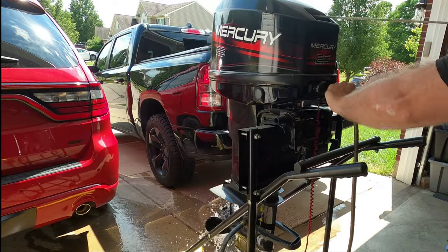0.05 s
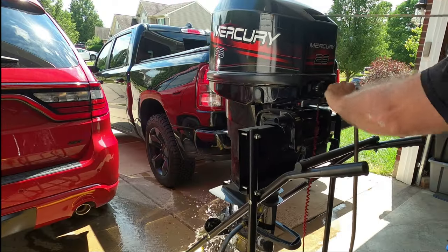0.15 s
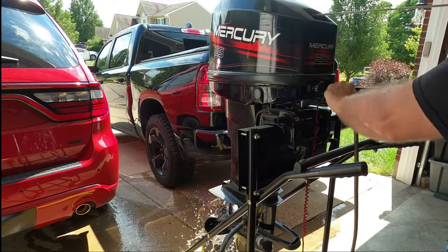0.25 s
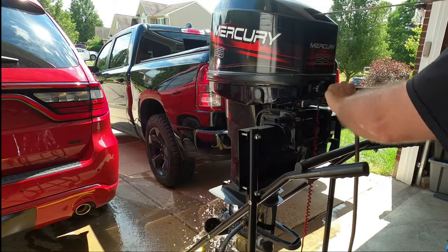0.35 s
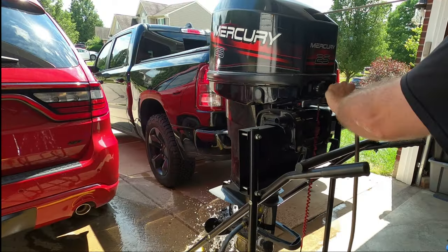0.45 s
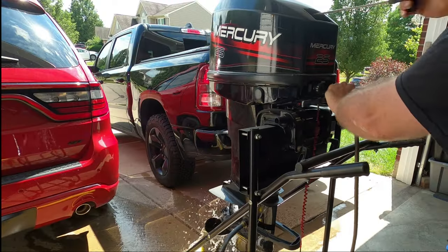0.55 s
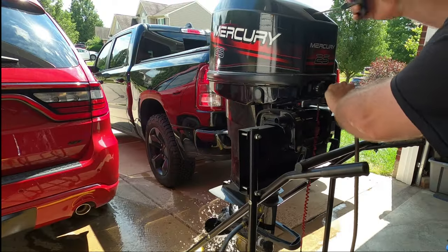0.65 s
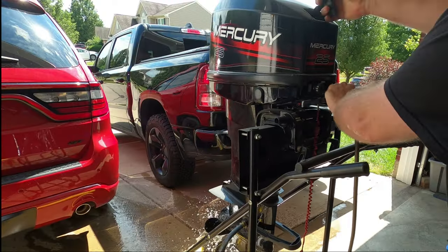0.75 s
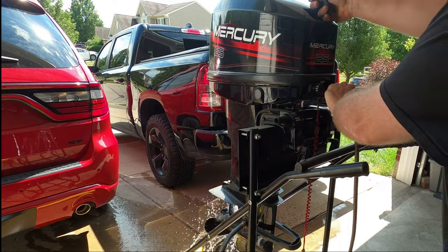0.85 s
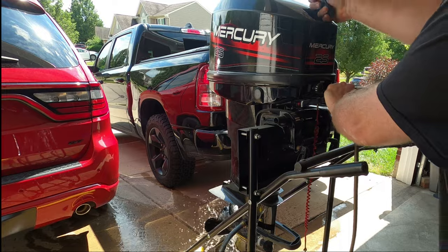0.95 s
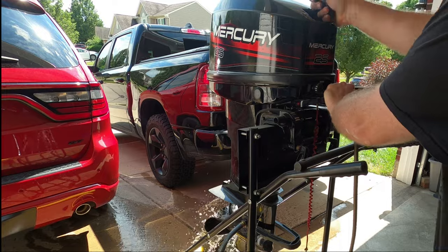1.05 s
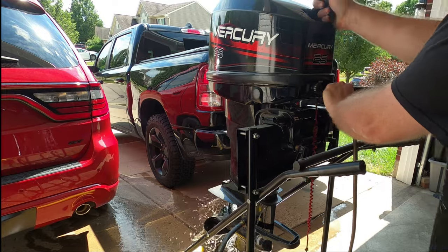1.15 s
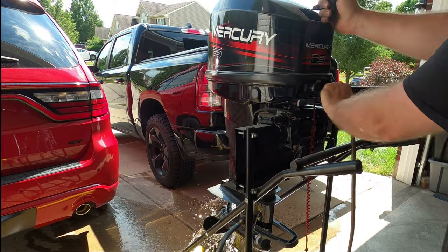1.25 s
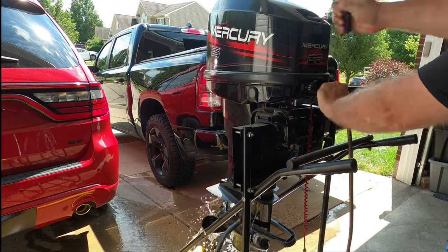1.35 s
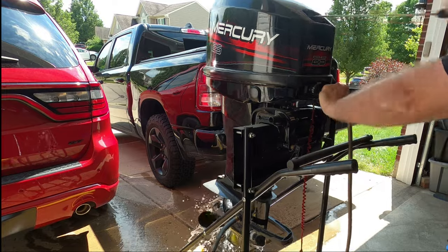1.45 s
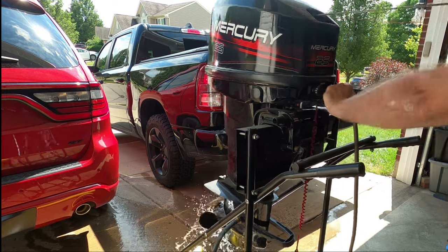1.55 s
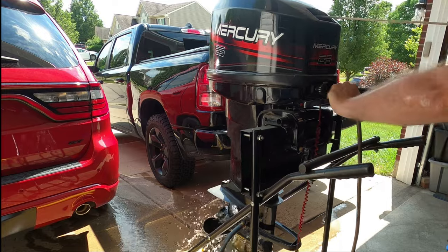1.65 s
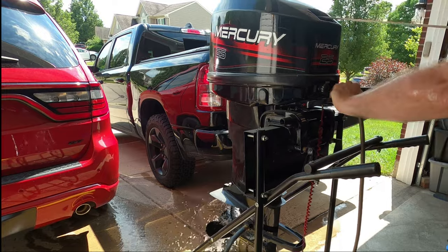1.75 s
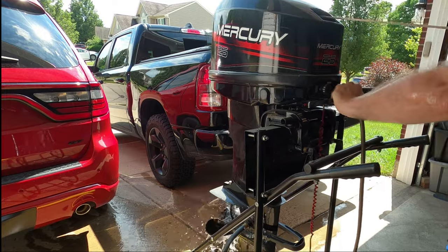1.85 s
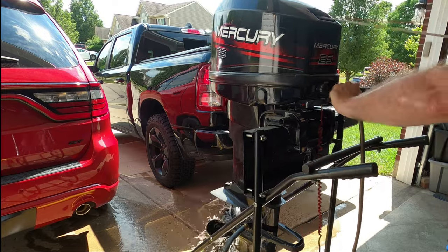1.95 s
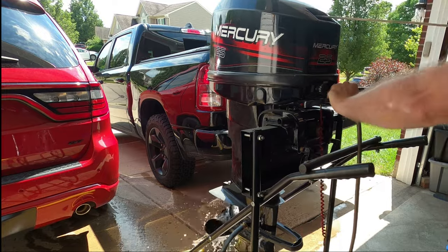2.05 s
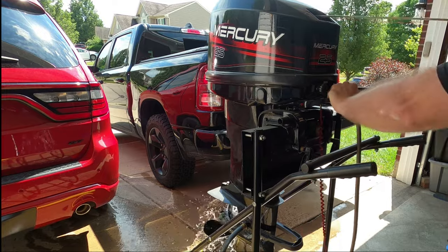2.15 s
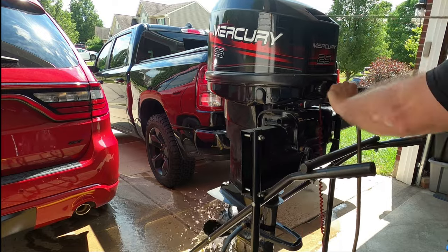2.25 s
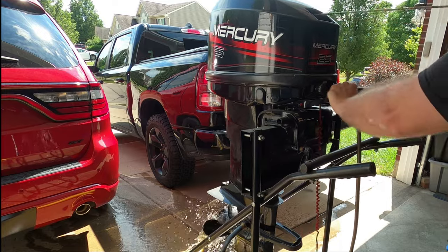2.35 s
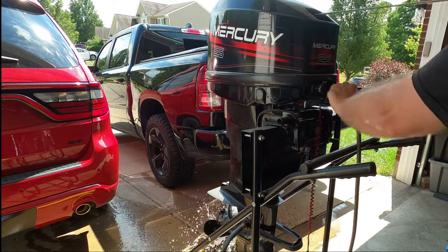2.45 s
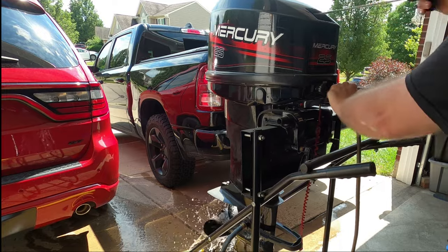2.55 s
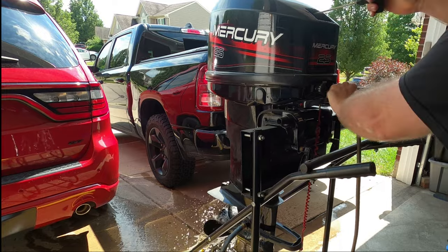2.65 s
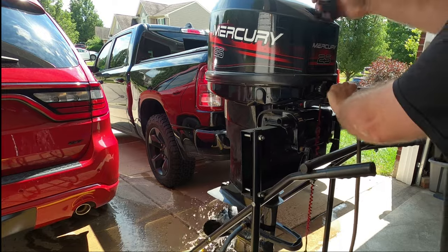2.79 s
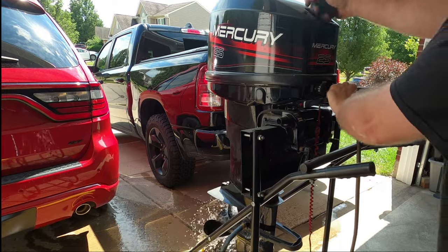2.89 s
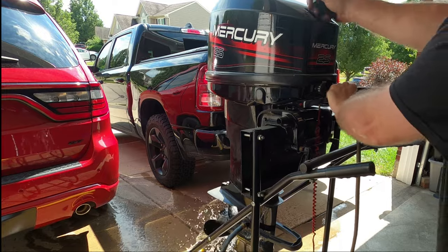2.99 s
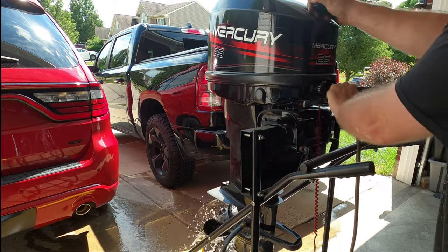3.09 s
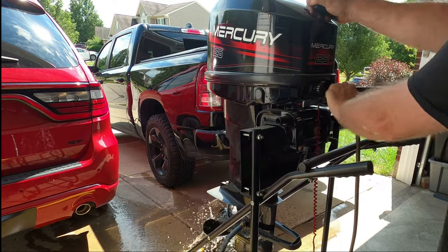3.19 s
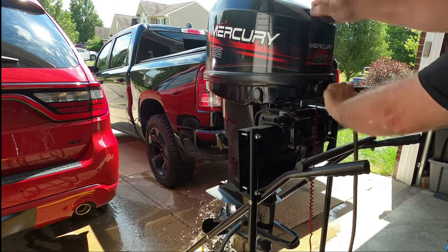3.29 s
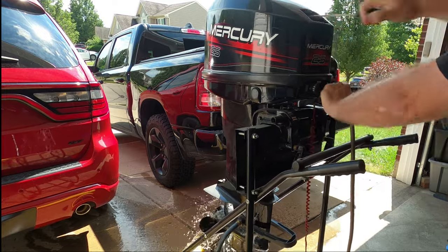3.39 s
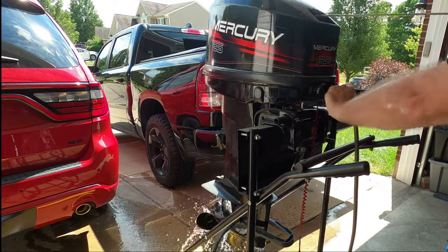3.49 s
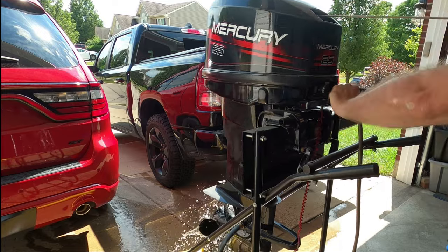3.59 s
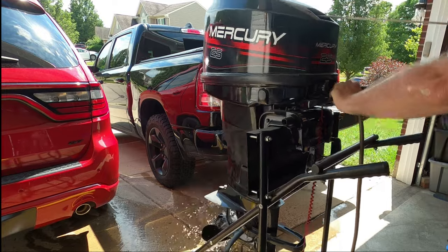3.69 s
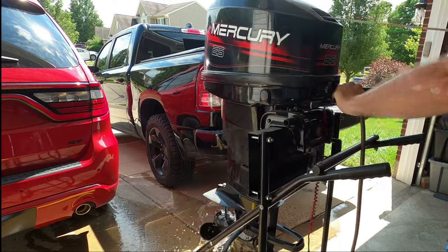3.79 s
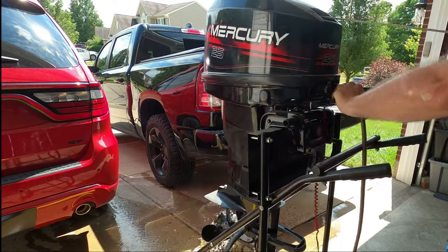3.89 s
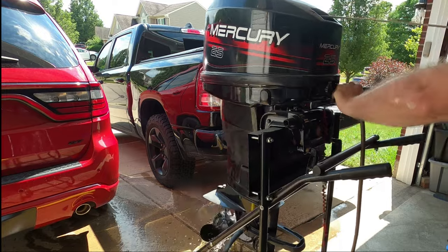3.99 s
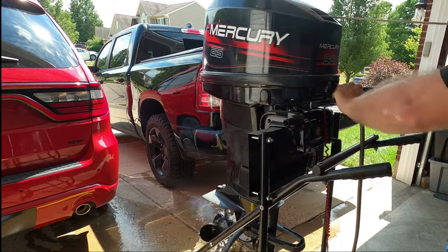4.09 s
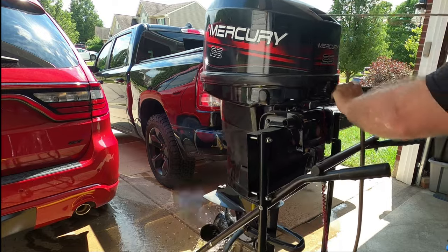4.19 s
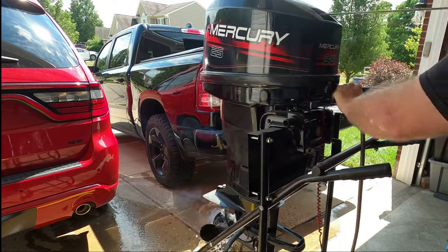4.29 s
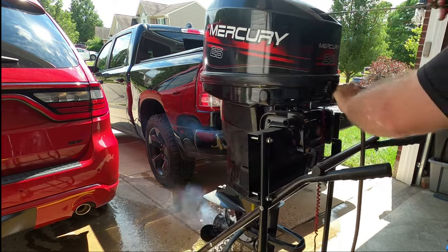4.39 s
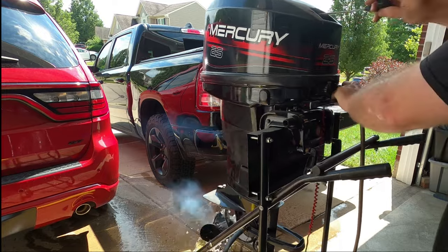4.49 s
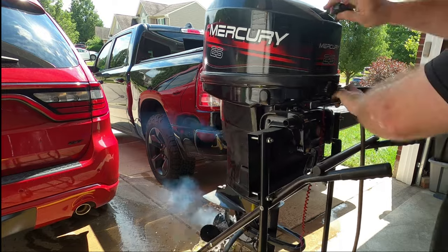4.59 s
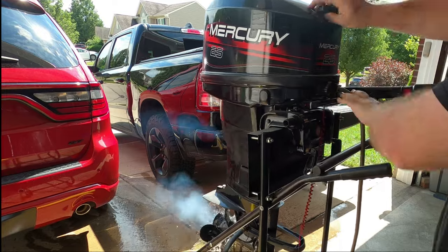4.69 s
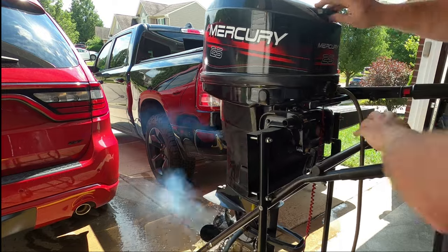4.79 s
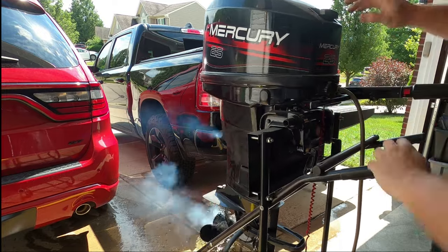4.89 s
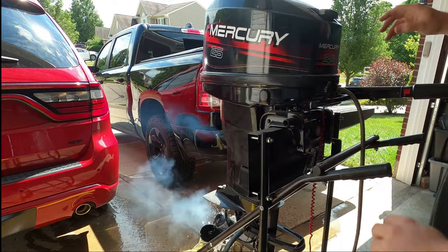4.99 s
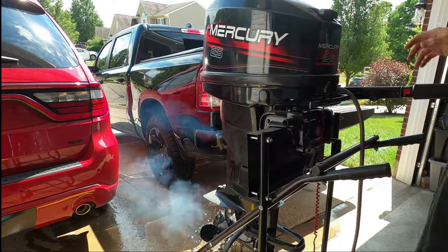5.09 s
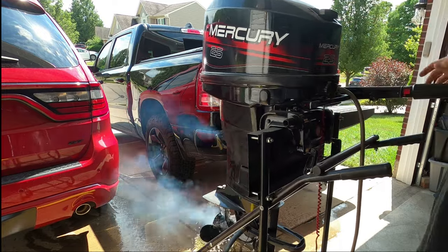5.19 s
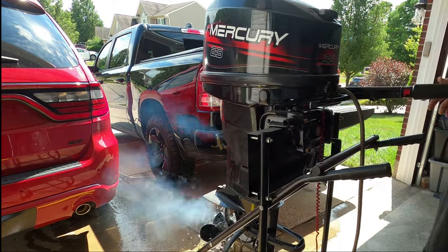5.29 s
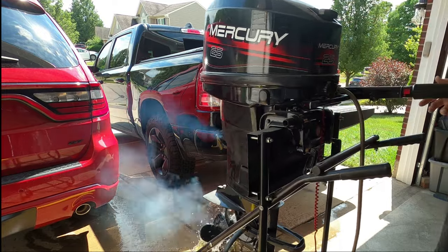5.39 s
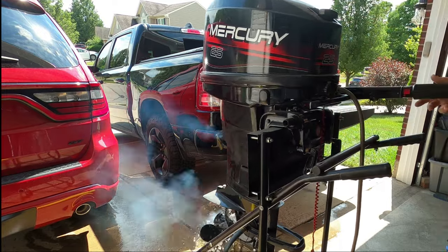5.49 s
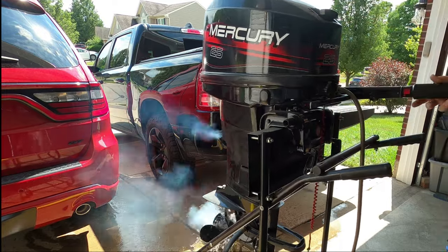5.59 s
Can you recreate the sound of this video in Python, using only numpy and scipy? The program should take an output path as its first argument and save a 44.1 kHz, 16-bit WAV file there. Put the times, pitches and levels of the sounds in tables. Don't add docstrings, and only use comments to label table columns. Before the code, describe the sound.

Water patters steadily on a concrete drive over a faint neighbourhood hum. A small outboard engine is yanked by rope: clunk, whirr, thudding compressions, then nothing. A second yank makes it sputter and fire, running in short barking groups with metallic rattles and hollow throaty exhaust between. Close microphones, short slap of echo from the wall.

```python
import sys
import numpy as np
from scipy import signal
from scipy.fft import rfft, irfft, next_fast_len
from scipy.io import wavfile
from scipy.ndimage import uniform_filter1d, map_coordinates

SR = 44100
rng = np.random.default_rng(int(sys.argv[2]) if len(sys.argv) > 2 else 0)


def attenuation_scalar(level_db):
    decades = np.asarray(level_db, float) / 20
    return 10 ** decades


def master(y):
    cut = np.clip(np.atleast_2d(y).T, -1, 1)
    pcm = np.round(cut * 32767)
    wavfile.write(sys.argv[1], SR, pcm.astype(np.int16))


N = 248724

# start in seconds, peak in dB, pipe pitch in Hz, throat gas in dB.
CHUFFS = [(0.0, -18.5, 54.2, -9), (0.048, -11.5, 62.2, -15.5), (0.102, -15.5, 59.2, -25),
          (0.168, -25.5, 65.5, -9), (0.22, -16.5, 64, -19), (1.555, -23, 84, 1.5), (1.633, -7, 79, -7.5),
          (1.697, -14.5, 95, 0), (1.749, -7, 60.2, -7.5), (1.799, -9, 72.4, -8), (1.843, -3.5, 64.7, -17.5),
          (1.897, -11, 51.6, -8), (1.968, -11.5, 82.3, -8.5), (2.056, -11.5, 58.6, -11),
          (2.209, -27, 71.3, -14), (2.253, -21, 64.7, -13), (3.556, -23, 75, -0.5), (3.626, -8, 81.4, -10),
          (3.694, -7, 78, -10), (3.727, -10, 77.6, -5.5)]
# start in seconds, rattle peak in dB, loosest part in Hz, bark in dB.
FIRED = [(1.7234, -19, 2640, -16), (1.835, -14.5, 2700, -26), (1.8839, -18.5, 3940, -21),
         (3.7093, -17, 3360, -18), (3.7396, -13, 4090, -8), (3.772, -15.5, 2650, -25),
         (3.8004, -14.5, 5500, -13.5), (3.826, -19, 2700, -26), (3.8509, -39, 2560, -10.5),
         (3.958, -23, 2800, -19), (4.111, -16.5, 3680, -7.5), (4.157, -18, 3110, -20),
         (4.2215, -19, 3480, -11), (4.2788, -31, 2560, -24), (4.4648, -18, 3160, -6),
         (4.5205, -19.5, 3030, -25), (4.575, -20, 3160, -17), (4.719, -23.5, 2950, -13.5),
         (4.7702, -17, 3230, -15), (4.8287, -21, 3130, -9.5), (5.0165, -16, 2950, -26),
         (5.0592, -19, 3100, -11.5), (5.1105, -19, 3130, -7.5), (5.3065, -16, 3140, -15),
         (5.3556, -17.5, 3150, -15), (5.4159, -20, 3120, -8), (5.6076, -21, 2880, -45)]
# pitch in Hz, width in Hz, level in dB.
THROAT = [(219.4, 28.7, -2.5), (291, 46.4, -4.5), (344, 29, -0.5), (417.8, 36.4, 2), (459.4, 46, 2.5),
          (500.4, 52, -3.5), (809, 50, -20.5), (1190, 47, -20.5)]


def unit(x):
    return x / np.sqrt(np.mean(x ** 2) + 1e-20)


def along(points, hz):
    f, v = np.transpose(points)
    return np.interp(np.log(hz + 1), np.log(f + 1), v)


def curves(rows):
    s, *cols = np.transpose(rows)
    return [np.interp(np.arange(N) / SR, s, c) for c in cols]


def wobble(rate):
    knots = rng.standard_normal(int(N * rate / SR) + 4)
    return map_coordinates(knots, [np.arange(N) * rate / SR])


def filtered(x, response):
    m = next_fast_len(x.shape[-1] + 8192)
    return irfft(rfft(x, m) * response(np.fft.rfftfreq(m, 1 / SR)), m)[..., :x.shape[-1]]


def resonances(modes):
    def response(f):
        total = 0
        for k, (centre, width, db) in enumerate(modes):
            damping = 1j * f * width
            total = total + (-1) ** k * attenuation_scalar(db) * damping / (centre * centre - f * f + damping)
        return total
    return response


def noise(spectrum, size=N):
    return unit(filtered(rng.standard_normal(size), lambda hz: attenuation_scalar(along(spectrum, hz))))


def fade(t, attack, t60):
    return (1 - np.exp(-t / attack)) * attenuation_scalar(-60 * t / t60)


def add(track, s, sound):
    part = track[max(round(s * SR), 0):][:len(sound)]
    part += sound[:len(part)]


def shocks(blows, fall):
    train = np.zeros(N)
    for s, size in blows:
        train[round(s * SR)] = size
    falling = signal.lfilter([1], [1, -np.exp(-1 / (fall * SR))], train)
    return uniform_filter1d(falling, size=260, origin=129)


def firings():
    return [(s, attenuation_scalar(.5 * (bark_db + 4))) for s, _, _, bark_db in FIRED]


def hum():
    # frequency in Hz, noise density in dB per Hz.
    rumble_spectrum = [(12, -40), (20, 0), (100, -1.5), (210, 5), (330, -8.5), (448, -13), (700, -41),
                       (1300, -120)]
    # tone in Hz, level in dB rms.
    far_machine = [(113.0, -48.5), (134.6, -51), (177.6, -64), (199.2, -49.5), (269.2, -78), (312.2, -60.5)]
    t = np.arange(N) / SR
    tones = np.zeros(N)
    for hz, db in far_machine:
        level = attenuation_scalar(db + 1.0 + 2.1 * wobble(4.0))
        tones += level * np.sin(2 * np.pi * hz * t + 0.72 * wobble(4.23))
    return attenuation_scalar(-44) * np.array([noise(rumble_spectrum), noise(rumble_spectrum)]), tones


def blend(pair):
    # frequency in Hz, left-right likeness from 0 to 1.
    likeness = [(60, 0.98), (240, 0.93), (950, 0.59), (3770, 0.66), (15000, 0.046)]

    def mid_side(hz):
        angle = np.arccos(np.clip(along(likeness, hz), -1, 1)) / 2
        return np.array([np.cos(angle), np.sin(angle)])
    mid, side = filtered(pair, mid_side)
    return np.array([mid + side, mid - side])


def wall(x):
    # frequency in Hz, decay t60 in seconds.
    decay = [(100, 0.55), (1000, 0.32), (10000, 0.29)]
    hz, t, z = signal.stft(rng.standard_normal((2, SR // 3)), SR, nperseg=256)
    tail = signal.istft(z * attenuation_scalar(-60 * t / along(decay, hz)[:, None]), SR, nperseg=256)[1]
    late = np.pad(x, (200, 0))[None]
    return signal.fftconvolve(late, tail / np.linalg.norm(tail[0]), axes=1)[:, :N]


def splats(times, levels_db, pitches, cycles, length):
    t = np.arange(length)[None] / SR
    u = t * (pitches / cycles)[:, None]
    tone = np.sin(2 * np.pi * pitches[:, None] * t * (1 + 0.005 * u))
    burst = attenuation_scalar(levels_db)[:, None] * np.e * u * np.exp(-u) * tone
    at = (times * SR).astype(int)[:, None] + np.arange(length)
    return np.bincount(at.ravel(), burst.ravel(), N + 2 * length)[:N]


def water():
    # time in seconds, level of the bed in dB.
    bed_level = [(0.0, -37), (0.16, -40), (0.47, -38.5), (0.96, -35), (1.11, -34), (1.55, -37.5), (1.76, -36.5),
                 (1.96, -39.5), (2.21, -41.5), (2.58, -37.5), (3.69, -36.5), (3.86, -38.5), (4.79, -41),
                 (5.29, -41), (5.64, -43.5)]
    # frequency in Hz, density of the bed in dB per Hz.
    spray = [(240, -85), (450, -10.5), (861, -14.5), (1280, -4.5), (2720, -4.5), (5330, -4), (9540, -10),
             (15600, -28)]
    # start in seconds, peak
    # in dB, pitch in Hz.
    big_drops = [(0.0916, -21.5, 3900), (0.1231, -19.5, 2610), (0.156, -24, 2040), (0.195, -22.5, 3930),
                 (0.2643, -25, 4400), (0.325, -24, 2420), (0.4529, -16, 2030), (0.5566, -23.5, 2710),
                 (0.6365, -39, 4240), (0.6643, -22, 3360), (0.726, -23, 6000), (0.7512, -20.5, 2990),
                 (0.785, -24, 3730), (0.8195, -28, 3200), (0.846, -21, 3980), (0.9656, -16, 3820),
                 (1.0146, -27, 4140), (1.055, -24, 3370), (1.0925, -18, 4140), (1.124, -12, 2620),
                 (1.2378, -18.5, 3080), (1.273, -19.5, 4170), (1.2994, -21, 5030), (1.3917, -27, 4020),
                 (1.424, -24.5, 2120), (1.4507, -21.5, 2720), (1.494, -28, 2780), (1.515, -25, 1340),
                 (1.585, -17.5, 2400), (1.6305, -20, 3040), (1.7245, -15, 2430), (1.767, -33, 1440),
                 (1.8343, -15.5, 1900), (1.8859, -16, 1930), (2.0386, -34, 1300), (2.1208, -23, 3980),
                 (2.2802, -22.5, 4300), (2.432, -21, 4600), (2.4726, -24, 3770), (2.5366, -17.5, 2640),
                 (2.607, -23, 2930), (2.6215, -19, 4190), (2.7095, -26, 2630), (2.7392, -28, 2760),
                 (2.769, -24, 5150), (2.816, -38, 4010), (2.8703, -18, 3180), (2.9652, -23.5, 2780),
                 (3.021, -14, 2930), (3.1138, -20, 2820), (3.17, -20, 2440), (3.1986, -17, 3200),
                 (3.2183, -17, 2360), (3.2765, -18.5, 6300), (3.3732, -37, 2860), (3.4142, -18.5, 3820),
                 (3.4336, -13.5, 2360), (3.475, -16, 4110), (3.5035, -19, 1490), (3.5522, -15.5, 4170),
                 (0.98, -27, 8900),
        (1.775, -21, 4000),
        (2.2, -31, 1350),
        (2.585, -27, 1400),
        (2.918, -28, 1300),
        (3.132, -25, 2900),
        (3.444, -22, 2600),
        (3.62, -24, 4000),
        (3.646, -23, 1330),
    ]
    z = signal.stft(rng.standard_normal((2, N)), nperseg=256)[2]
    field = uniform_filter1d(uniform_filter1d(rng.standard_normal(z.shape[1:]), 8, 0), 8, 1)
    hiss = unit(signal.istft(z * attenuation_scalar(1.6 * unit(field)), nperseg=256)[1][:, :N])
    small = []
    for g, clump in zip(rng.random((2, 5600, 4)), rng.random((2, 800, 2)).repeat(7, 1)):
        times = np.clip(clump[:, 0] * N / SR + .03 * g[:, 0], 0, N / SR)
        size_db = np.minimum(-5 * np.log(g[:, 1]), 11)
        pitches = 1900 * 5.5 ** clump[:, 1] * 1.97 ** g[:, 2]
        cycles = .35 + 1.2 * g[:, 3] ** 2
        small.append(splats(times, size_db, pitches, cycles, length=130))
    gust_db = .7 * wobble(14) + 1.3 * wobble(45)
    bed = filtered(hiss + 0.71 * unit(np.array(small)), lambda hz: attenuation_scalar(along(spray, hz)))
    bed = unit(bed) * attenuation_scalar(curves(bed_level)[0] - 1.0 + gust_db)

    drops = np.array(big_drops)
    s, db, hz = drops.T
    pan_db = 1.5 * rng.standard_normal(len(s))
    big = np.array([splats(s, db - 2.5 + side * pan_db / 2, hz, 1.25 + 0 * s, length=600) for side in (1, -1)])
    t = np.arange(SR // 8) / SR
    for at, level, centre in drops:
        splash = noise([(centre / 5.1, -30), (centre, 0), (centre * 1.54, -7), (15000, -22)], size=len(t))
        splash *= attenuation_scalar(level - 21.5) * (fade(t, 0.00042, 0.093) + 2.14 * fade(t, 0.00051, 0.031))
        add(big[0], at, splash)
        add(big[1], at, splash)
    return bed, big


def knocks():
    # start in seconds, peak in dB, t60 in seconds, brightness in dB.
    blows = [
        (0.317, -19, 0.2, -11),
        (0.93, -27, 0.22, 1),
        (1.494, -10.5, 0.095, -10),
        (1.513, 3, 0.29, -8),
        (1.529, -4, 0.043, -14),
        (2.201, -15.5, 0.087, -6),
        (2.349, -20, 0.25, -3),
        (2.962, -16, 0.4, -3),
        (3.507, 2.5, 0.22, -7.5),
        (3.519, -5.5, 0.21, -25),
    ]
    # pitch in Hz, level in dB, t60 in seconds.
    cowl = [(175, 7.5, 0.28), (387, 4, 0.24), (541, -0.5, 0.031), (896, -32, 0.32), (1350, 3, 0.028),
            (1610, -25, 0.16), (2116, -9, 0.12), (3400, -18, 0.071)]
    out, t = np.zeros(N), np.arange(SR // 4) / SR
    for s, db, t60, bright_db in blows:
        ring = np.zeros(len(t))
        for hz, level, long in cowl:
            ring += attenuation_scalar(level + 2 * rng.normal() - 60 * t / long) * np.sin(2 * np.pi * hz * t)
        spectrum = [(150, -1.0), (400, 1.0), (1500, -6.0 + bright_db), (4000, -20.5 + bright_db), (9000, -61)]
        crack = noise(spectrum, size=len(t))
        hand = 0.034 + 0.46 / (1 + (t / 0.028) ** 4)
        add(out, s, attenuation_scalar(db - 11.0) * (0.59 * ring + crack) * fade(t, 0.00072, t60) * hand)
    return filtered(out, lambda hz: 1 / (1 + (135 / (hz + 1)) ** 6))


def chatter():
    # start in seconds, length in seconds, pitch in Hz, level in dB.
    spells = [
        (3.735, 0.13, 1450, -29),
        (4.177, 0.11, 1565, -27.5),
        (4.529, 0.065, 1450, -32.5),
        (5.06, 0.031, 1470, -32),
        (5.117, 0.042, 1570, -30.5),
    ]
    out = np.zeros(N)
    for s, length, hz, db in spells:
        size = round(length * SR)
        ring = unit(filtered(rng.standard_normal(SR // 4), resonances([(hz, 70, 0)])))[:size]
        add(out, s, attenuation_scalar(db) * np.sqrt(np.hanning(len(ring))) * ring)
    return out


def spin():
    # pawl grabs, full speed and let go in seconds, casing at full speed in dB.
    pulls = [
        (-.3, -.1, 0.071, -39.5),
        (1.508, 1.728, 1.782, -26.5),
        (3.494, 3.726, 5.7, -27.5),
    ]
    t = np.arange(N) / SR
    kick_db = 4 * shocks(firings(), .022)
    kick_db += 4 * shocks([(s, 1) for s, *_ in CHUFFS], 0.022)
    gain = np.zeros(N)
    for grab, full, free, db in pulls:
        wind_up_db = -13 * np.clip((full - t) / (full - grab), 0, 1)
        jerk_db = 9 * np.exp(-np.abs(t - grab) / 0.014)
        run_down_db = -46 * np.maximum(t - free, 0)
        gain += (t > grab) * attenuation_scalar(db + wind_up_db + jerk_db + run_down_db)
    return attenuation_scalar(kick_db) * gain


def casing(turn):
    # pitch in Hz, width in Hz, level in dB.
    block_modes = [(815, 80, -1), (1045, 60, -3), (1420, 50, -1), (1560, 80, -3), (1930, 200, -6),
                   (2450, 100, -10), (3200, 120, -13), (5050, 300, -21)]
    # frequency in Hz, density of the whirr in dB per Hz.
    whirr = [(350, -18), (600, -4), (923, -8), (1960, -12.5), (3700, -23.5), (4230, -23), (12100, -102),
             (15000, -86)]
    beat = attenuation_scalar(3.3 * np.cos(2 * np.pi * turn) + 1.6 * wobble(30))
    block = unit(filtered(rng.standard_normal(N) * beat, resonances(block_modes)))
    sound = unit(.75 * block + beat * noise(whirr))
    return sound * spin() * attenuation_scalar(-3.5)


def chuffs():
    out, t = np.zeros(N), np.arange(SR // 3) / SR
    for s, db, hz, throat_db in CHUFFS:
        t60 = 0.28 * attenuation_scalar(-0.29 * (db + 9.5))
        pipe = np.sin(2 * np.pi * hz * t) + 0.36 * np.sin(2 * np.pi * 1.56 * hz * t + 0.96)
        gas = unit(filtered(rng.standard_normal(len(t)), resonances(THROAT)))
        add(out, s, attenuation_scalar(db - 2.0) * fade(t, 0.0026, t60) * (pipe + attenuation_scalar(throat_db - 4.5) * gas))
    return out


def barks():
    # start in seconds, peak in dB.
    pulses = [(3.736, -9.5), (3.798, -12), (3.823, -8), (3.853, -10), (3.898, -13), (3.922, -3),
              (4.105, -10.5), (4.135, -20), (4.152, -17), (4.202, -11), (4.226, -6.5), (4.293, -19),
              (4.351, -8.5), (4.467, -9), (4.53, -11), (4.557, -9), (4.575, -4), (4.615, -8), (4.681, -14),
              (4.706, -11), (4.725, -2), (4.77, -4.5), (4.796, -7), (4.831, -6.5), (4.855, -16),
              (4.891, -8), (5.019, -5.5), (5.043, -13), (5.061, -6), (5.086, -11), (5.122, -6), (5.308, -9),
              (5.331, -4), (5.373, -13), (5.411, -4), (5.433, -16)]
    # start in seconds, peak in dB.
    pops = [
        (1.644, -18),
        (1.703, -17),
        (1.756, -25),
        (1.801, -18),
        (1.86, -15.5),
        (3.645, -25),
        (3.699, -15),
    ]
    # pitch in Hz, width in Hz, level in dB.
    mouth = [(308, 76, -5.5), (361, 60, -3), (431, 43, 3.5), (517, 137, -6.5), (770, 68, -16.5)]
    out, t = np.zeros(N), np.arange(SR // 10) / SR
    for s, db in pulses:
        push = (3.7 + rng.standard_normal(len(t))) * t * np.exp(-t / 0.0041 * 3)
        ring = filtered(push, resonances(mouth))
        add(out, s - .004, attenuation_scalar(-5.5 + .9 * db) * ring / np.abs(ring).max())
    u = t * 714 * 2
    for s, db in pops:
        add(out, s, attenuation_scalar(db - 0.5) * (1 - u) * u * np.exp(-u) * 4)
    return out


def fired():
    # frequency in Hz, density of the blast in dB per Hz.
    bang = [(350, -26), (600, 2), (1520, 10.5), (2650, -2), (3300, 4), (4960, -2), (8100, -27.5),
            (15600, -47)]
    # pitch in Hz, width in Hz, level in dB.
    port = [(294, 53, -3.5)]
    out, t = np.zeros(N), np.arange(SR // 4) / SR
    muffled = lambda f: resonances(THROAT + port)(f) / (1 + 1j * f / 1200) ** 2
    pipe = 0.75 * np.sin(2 * np.pi * 55 * t) + 1.09 * np.sin(2 * np.pi * 72 * t)
    thump = fade(t, .008, .17) * pipe
    for s, db, hz, throat_db in FIRED:
        bracket_hz = 5010 * rng.uniform(0.94, 1.04)
        thump_db = -12.5 + 0.34 * (throat_db + 12.5)
        hold_s = 0.018 * attenuation_scalar(.5 * (db + 21.5))
        hold = fade(t, 0.0017, 0.24) / (1 + (t / hold_s) ** 4)
        parts = [(hz, 130, 0), (1460, 60, -5), (bracket_hz, 220, -7), (rng.uniform(3700, 4200), 200, -8),
                 (6400, 200, -13), (rng.uniform(7800, 8600), 600, -15),
                 (rng.uniform(9200, 10200), 700, -18), (12200, 1800, -27)]
        loose = unit(filtered(rng.standard_normal(len(t)), resonances(parts)))
        tilt = 0.41 * (db + 15.5)
        blast = noise([(f, level + tilt * np.log2(f / 3000)) for f, level in bang], size=len(t))
        contacts = np.repeat(rng.standard_normal(len(t) // 60 + 1), 60)[:len(t)]
        grit = uniform_filter1d(attenuation_scalar(2.8 * contacts), size=24)
        rattle = unit(loose + unit(grit * blast))
        bark = unit(filtered(rng.standard_normal(len(t)) * fade(t, 0.00043, 0.023), muffled))
        add(out, s, attenuation_scalar(db - 9.0) * hold * rattle + attenuation_scalar(throat_db - 22.0) * bark + attenuation_scalar(thump_db) * thump)
    return out


def running():
    # start in seconds, strokes a second there, end in seconds, strokes a second there.
    bursts = [
        (3.74, 44.5, 3.8, 46),
        (4.06, 36.5, 4.28, 47.6),
        (4.45, 43.8, 4.6, 48),
        (4.74, 45.8, 4.87, 50.3),
        (5.0, 46.5, 5.175, 50),
        (5.3, 46.5, 5.445, 49.9),
        (5.64, 43.5, 5.8, 49),
    ]
    t = np.arange(N) / SR
    rate, load = curves([row for s, slow, end, fast in bursts for row in ((s, slow, 0), (end, fast, 1))])
    strain = np.where(np.gradient(load) > 0, np.sqrt(load), load ** 4)
    rate = rate - 7 * load * (1 - load) * (t < bursts[1][0])
    under = np.maximum(46.5 - rate, 0)
    turn = np.cumsum(rate * (1 + .006 * wobble(14))) / SR

    second_db = -13.5 - 3.5 * strain - .5 * under
    third_db = -30.5 - 2.5 * strain + 1.22 * under
    orders = attenuation_scalar(second_db) * np.sin(4 * np.pi * turn) + attenuation_scalar(third_db) * np.sin(6 * np.pi * turn + 1.7)
    orders *= attenuation_scalar(-19 * shocks(firings(), 0.0078))
    orders += attenuation_scalar(-31 + 3.5 * wobble(10)) * np.sin(2 * np.pi * turn)

    at = np.flatnonzero(np.diff(np.floor(turn)))
    luck = rng.standard_normal((len(at), 2))
    late = (.00012 * luck[:, 0] * SR).astype(int)
    uneven_db = 1.2 * (-1) ** np.arange(len(at)) + 1.3 * luck[:, 1]
    puffs = np.zeros(N)
    puffs[np.clip(at + late, 0, N - 1)] = attenuation_scalar(uneven_db)
    puffs += 0.43 * np.roll(puffs, round(0.01022 * SR))
    gush = rng.standard_normal(N) * np.exp(-2.5 * (turn % 1))
    clean = unit(filtered(puffs, resonances(THROAT)))
    rough = unit(filtered(gush, resonances(THROAT)))
    gas = unit(clean + (.33 + .5 * strain) * rough)
    gas_db = -23.5 + 1.5 * load + 0.17 * under
    caught = np.clip((t - bursts[0][0]) / 0.015, 0, 1)
    return caught * (orders + attenuation_scalar(gas_db) * gas), turn


def scene():
    exhaust, turn = running()
    motor = exhaust + casing(turn) + chuffs() + barks() + fired() + chatter() + knocks()
    bed, big = water()
    echo = filtered(wall(motor + big.mean(0)), lambda hz: hz / (hz + 1500) / (1 + (hz / 15000) ** 2))
    rumble, tones = hum()
    return motor + big + tones + attenuation_scalar(2.0) * echo + blend(bed + rumble)


def low_pass(x):
    return signal.sosfilt(signal.butter(12, 15730, fs=SR, output="sos"), x)


def record(dry):
    # frequency in Hz, left over right in dB.
    left_db = [(60, 2.5), (240, 2), (950, 2.0), (3770, 4), (15000, -0.5)]

    def lean(hz):
        lag = np.pi * hz / SR / (1 + (hz / 12000) ** 2)
        return attenuation_scalar(np.outer([.5, -.5], along(left_db, hz))) * np.exp(np.outer([-1j, 1j], lag))
    picked = filtered(dry, lean)
    squeezed = picked / (1 + np.abs(picked / .95) ** 4) ** (1 / 4)
    limited = filtered(squeezed, lambda hz: (hz < 15730) / (1 + (hz / 15000) ** 12))
    return low_pass(limited)


dry = scene()
out = record(dry)
master(out)
```